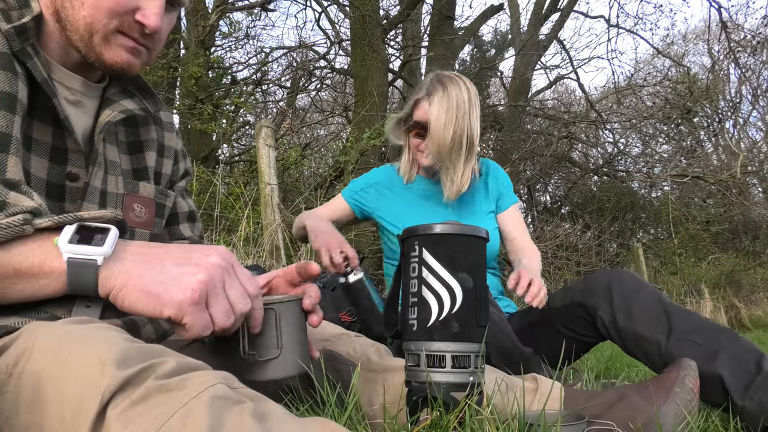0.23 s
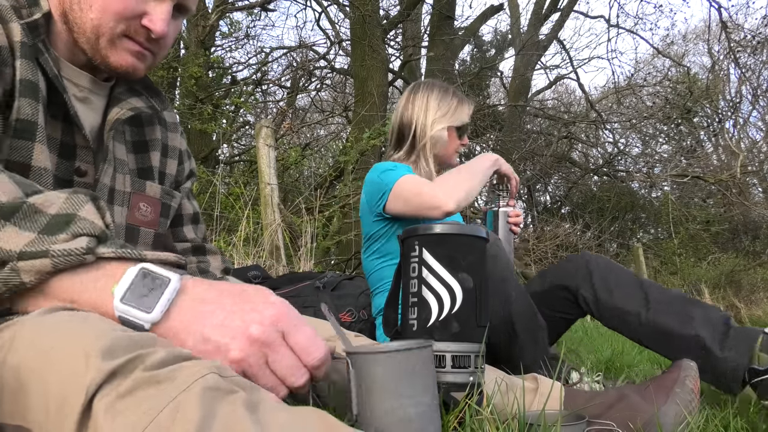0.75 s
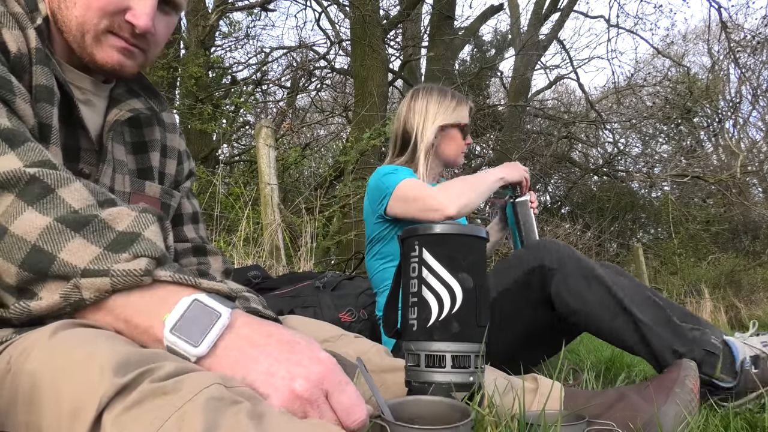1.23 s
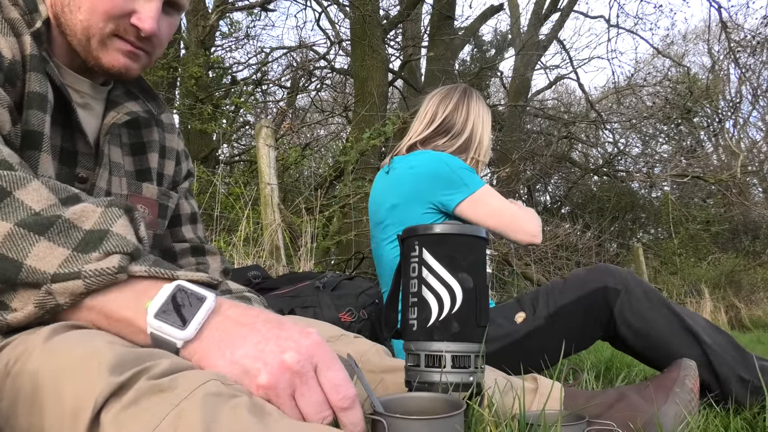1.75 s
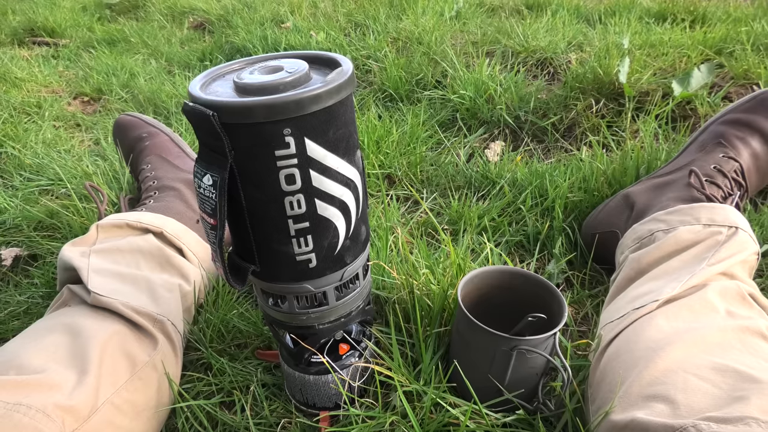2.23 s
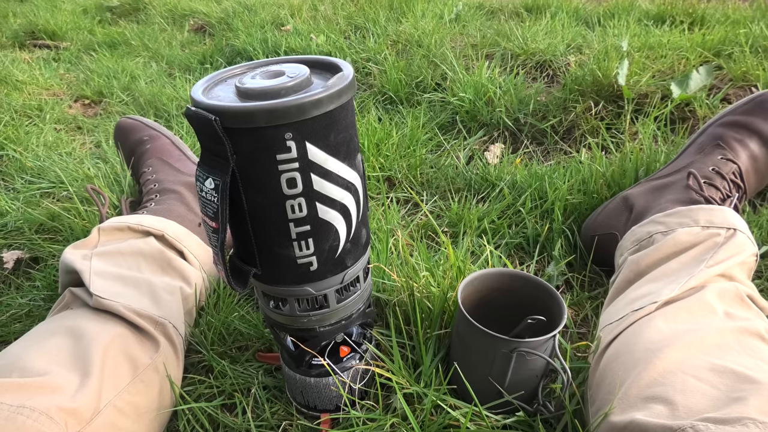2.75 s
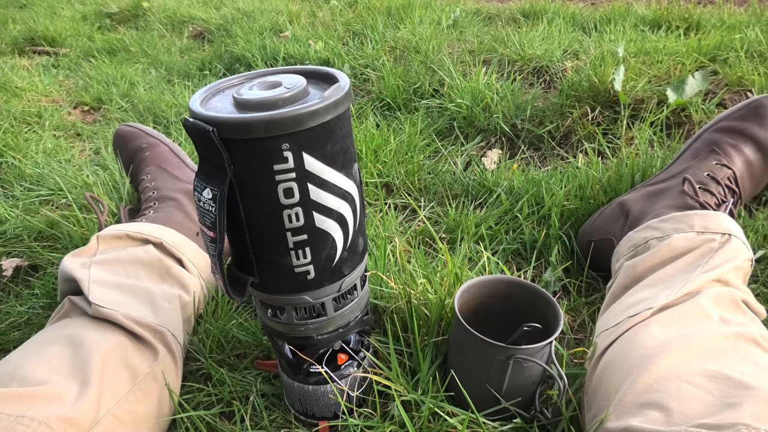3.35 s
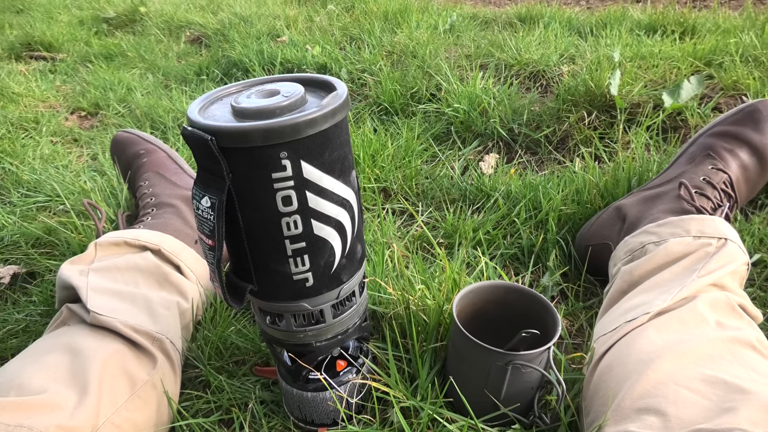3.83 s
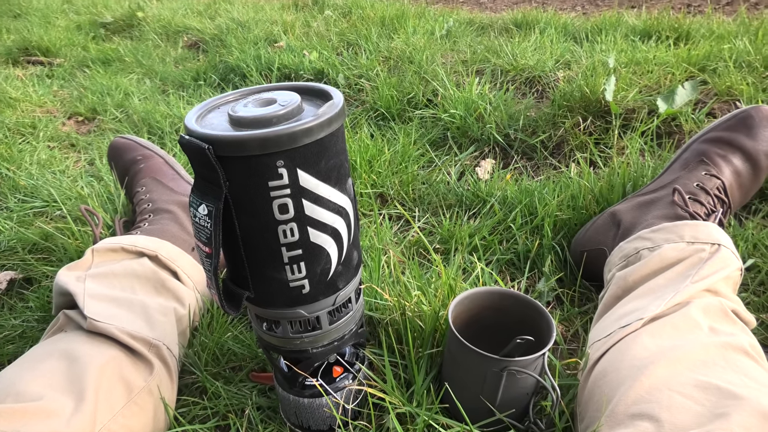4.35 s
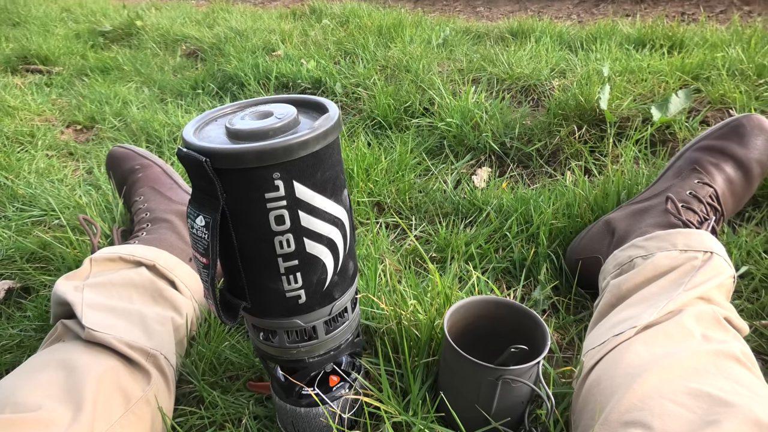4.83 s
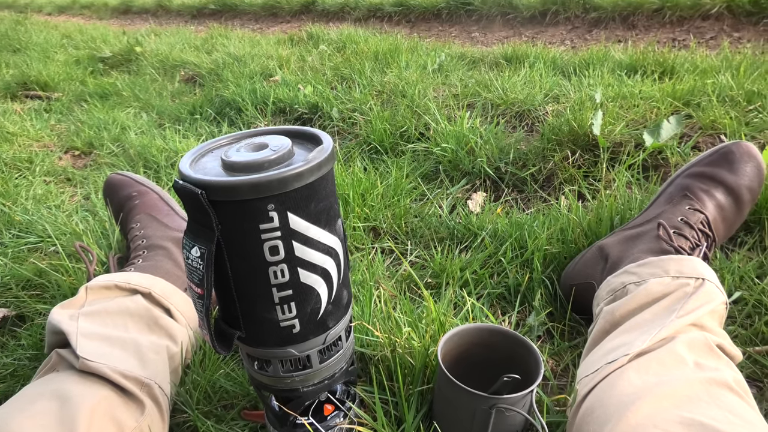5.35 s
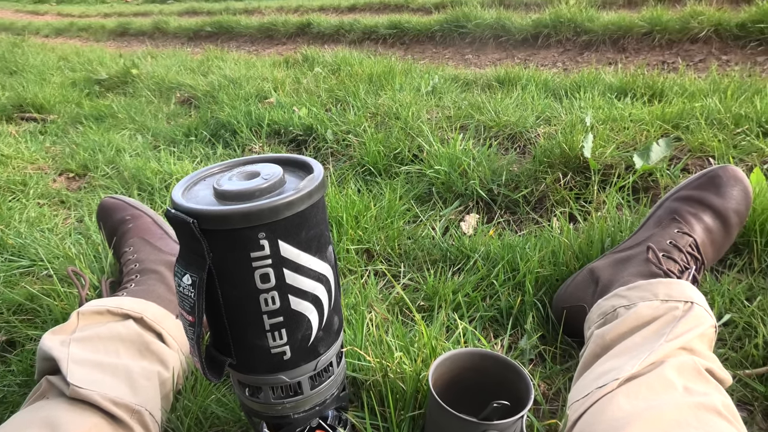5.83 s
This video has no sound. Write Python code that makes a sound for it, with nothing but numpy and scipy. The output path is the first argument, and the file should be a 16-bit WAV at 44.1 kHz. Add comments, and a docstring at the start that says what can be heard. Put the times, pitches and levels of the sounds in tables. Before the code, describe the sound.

Outdoors on grass, a small gas stove hisses continuously over a low flickering flame. A spoon clinks and scrapes on a metal mug at the start, then its wire handle clacks. Just before two seconds the close microphone moves above the burner; the hiss brightens, the flame roar thickens and low wind buffets. Sparse dry ticks, dull bumps and faint rustles follow, with no echo.

```python
"""Gas camping stove and metal mug on grass

Gas jet: broad noise plus noise bands at the burner resonances. Flame: low, flickering filtered noise.
Mug, spoon and wire handle: struck decaying modes, noise chatter and scraping grains.
The microphone moves from beside the stove to above it, into a breeze of low-pitched noise.
Ticks, bumps, rustles and rubs in the grass are enveloped noise; a faint bird is gliding sines."""
import sys
import numpy as np
from scipy import signal
from scipy.fft import rfft, irfft
from scipy.io import wavfile

SR = 44100
rng = np.random.default_rng(int(sys.argv[2]) if len(sys.argv) > 2 else 0)


def persist_wave(psi):
    """Save psi, clipped to +-1, as 16-bit WAV."""
    counts = np.round(np.clip(psi, -1, 1) * 32767).astype(np.int16)
    wavfile.write(sys.argv[1], SR, np.atleast_2d(counts).T)


N = 269010

# burner resonances before tilt: f/Hz, width/Hz, rms level/dB beside, above, at a slant
BURNER_BANDS = [(2305, 600, -57, -50, -49), (2714, 270, -53, -55, -56), (3547, 680, -63, -58, -59),
                (4940, 250, -55.5, -53, -54), (5143, 167, -72, -44.5, -43.5),
                (5640, 420, -51.5, -49.5, -43), (6150, 300, -45, -50.5, -60), (6525, 480, -45, -37, -35.5),
                (6860, 170, -71, -56, -53), (7500, 420, -51, -48, -66), (8127, 310, -47.5, -44.5, -40.5),
                (8690, 650, -44.5, -47, -45.5), (9930, 170, -72, -59.5, -66), (10470, 270, -54.5, -74, -64),
                (11360, 540, -57, -52.5, -52.5), (12200, 200, -62, -62, -70), (12500, 280, -48.5, -61, -48),
                (12830, 300, -59, -53, -55), (13450, 400, -60, -64, -68)]
# broad jet noise: f/Hz, density beside/dB per Hz, density above/dB per Hz
JET_SPECTRA = [(503, -72.5, -103), (606, -81, -92), (735, -76.5, -89.5), (1030, -85.5, -83),
               (1400, -80, -81.5), (2500, -77.5, -85), (3000, -75.5, -85), (3800, -81, -82.5),
               (4300, -79, -86.5), (5970, -85, -81.5), (9260, -89, -82), (9978, -88, -87),
               (14500, -89, -99), (16000, -100, -102)]
# microphone closeness to burner: t/s, level/dB
CLOSENESS_CURVE = [(0, -1.5), (.6, 0), (1.3, .5), (1.72, -2), (1.92, 4), (2.3, 1.1), (3.7, 1), (5.3, -0.2),
                   (5.8, -0.4)]
# flame roar, relative colour: f/Hz, density beside/dB per Hz, density above/dB per Hz
FLAME_SPECTRA = [(30, -29, -32), (62, -20, -23.5), (95, -12, -12.5), (146.7, 0, -3.5), (267, 0, 1.5),
                 (340, -4.5, -2.5), (460, -1.5, -8.5), (537, -14, -14), (642, -25, -19),
                 (768, -15.5, -31.5), (950, -33, -31), (1500, -33, -65)]
# flame roar before trim and flicker: t/s, level/dB
FLAME_CURVE = [(0.0, -40.5), (0.2, -36), (1.82, -36), (1.95, -28), (2.11, -31.5), (4.81, -30), (6.1, -34)]
# moving air, relative colour: f/Hz, density/dB per Hz
WIND_SPECTRUM = [(2, -19), (6, 5), (13, 4), (23, -13), (30, -13), (42, -26), (60, -44), (120, -64.5)]
# mug wall, lowest mode first, free ringing: f/Hz, level/dB, t60/s
MUG_MODES = [(1545, -14, .2), (2200, -10, .03), (2315, -13, .11), (3284, -22, .15), (3537, -11, .068),
             (4274, -20, .06), (4775, -9, .035), (5065, 0, .036), (5360, -9, .05), (6708, -13, .048),
             (7127, -16, .05), (7580, -8.5, .11), (7810, -10, .04), (7930, -8, .035), (8730, -11, .03),
             (10450, -9, .025), (12370, -16, .04), (14143, -12.5, .05)]
# spoon on mug: t/s, ring level/dB, extra on lowest mode/dB, chatter level/dB, chatter t60/s, free ring/s
SPOON_HITS = [(.003, -11, -25, -6, 0.024, 0.025), (.0337, -17.5, -14, -13, 0.017, .04),
              (.279, -24, -20, -17, 0.015, 0.007), (.5887, -28, 18.5, -16.5, 0.027, 0.022),
              (.592, -42, -10, -19.5, 0.05, .03)]
# loose metal, relative colour: f/Hz, density/dB per Hz
CHATTER_SPECTRUM = [(200, -46), (700, -26), (1100, -19), (1600, -3), (2500, -2), (4500, 4), (6000, -9),
                    (8000, 8.5), (10000, -10.5), (14000, -5), (16000, -9)]
# spoon sliding on mug: start t/s, end t/s, level of modal part/dB
SPOON_SLIDES = [(0.027, 0.094, -36), (0.361, 0.472, -34), (0.604, 0.676, -33), (0.665, 0.739, -36.5),
                (1.153, 1.188, -37), (1.541, 1.575, -36.5), (1.57, 1.632, -37.5)]
# mug with spoon pressed on it: f/Hz, level/dB, t60/s
PRESSED_MUG_MODES = [(1555, -15.5, 0.069), (2310, -8.5, 0.026), (3220, -13, 0.018), (3770, -7.5, 0.054),
                     (4560, -1.5, 0.022), (4800, 2, 0.019), (5140, -2.5, 0.018), (6250, -5, 0.0087),
                     (6800, -6, .014), (7430, -1, 0.025), (8540, -3, 0.012)]
# dry rasp, relative colour: f/Hz, density/dB per Hz
RASP_SPECTRUM = [(200, -40), (800, -17), (1600, -1), (4000, 0), (5600, -1), (8000, -2), (10000, -9),
                 (16000, -18)]
# folding wire handle, free ringing: f/Hz, level/dB, t60/s
HANDLE_MODES = [(815, -21.5, 0.035), (1250, -9.5, 0.026), (1635, -11, 0.042), (2050, -16.5, 0.063),
                (2800, 0, 0.016), (3850, -3, 0.042), (4150, 4, 0.018), (4380, 0, 0.017), (5900, 0.5, 0.022),
                (6600, -10, 0.032), (7150, -16, .015), (8440, -9, 0.023), (9260, 3, 0.012),
                (12550, -4, .025)]
# handle on mug: t/s, ring level/dB, extra on lowest mode/dB, chatter level/dB, chatter t60/s, free ring/s
HANDLE_HITS = [(.8205, -14.5, 6, -5.5, 0.0069, .035), (.8243, -44, 2, -26, 0.043, .03),
               (.856, -20.5, 7, -17.5, 0.015, .03), (.858, -27, 6, -23, 0.019, .02)]
# bird: start t/s, end t/s, start f/Hz, end f/Hz, level/dB
BIRD_CHIRPS = [(1.246, 1.3, 3700, 4700, -37.5), (1.72, 1.735, 3580, 3670, -33.5),
               (1.726, 1.747, 1860, 1700, -36), (3.145, 3.175, 3720, 3720, -43.5)]
# dry ticks of grass and cloth: t/s, level/dB, centre f/Hz, half-width/octaves, hold of the crumble/s
GRASS_TICKS = [(2.0732, -21, 5660, 0.39, .007), (2.792, -20.5, 7500, 0.58, 0.0011),
               (2.8305, -22, 5300, 0.46, 0.0056), (3.719, -32, 1900, 0.83, 0.0012),
               (5.0124, -18.5, 2100, 0.74, .0001)]
# dull bumps on the ground: t/s, level/dB
GROUND_BUMPS = [(2.791, -24), (2.831, -29), (3.312, -33), (4.451, -26.5)]
# grass and cloth stirring: start t/s, end t/s, rms level/dB
GRASS_STIRS = [(2.99, 3.06, -42), (3.425, 4.01, -44.5), (5.542, 5.65, -46), (6.02, 6.067, -45.5)]
# grass and cloth, relative colour: f/Hz, density/dB per Hz
RUSTLE_SPECTRUM = [(200, -18), (700, -0.5), (2000, 3.5), (4500, 9), (8000, -9.5), (16000, -11)]
# soft cloth rubs: start t/s, end t/s, start f/Hz, level/dB
CLOTH_RUBS = [(5.407, 5.483, 740, -47), (5.489, 5.553, 521, -43), (5.55, 5.62, 780, -49)]

TIME_S = np.arange(N) / SR
FREQS_HZ = np.maximum(np.fft.rfftfreq(N, 1 / SR), .1)   # above 0 for the logarithm

MOVE_S, MOVE_SETTLE_S = 1.65, 0.35   # beside to above
ABOVE_BEFORE, ABOVE_AFTER = 0.056, 0.94   # listening place: 0 beside, 1 above
SWING_S, SWING_WIDTH_S, RESTING_SLANT = 2.66, .31, .1   # one swing to a slant and back
SLANT_PITCH_RISE = .026   # share at full swing
HISS_DB = 0.03
HISS_TILT_DB_PER_OCTAVE, SLANT_TILT_DB_PER_OCTAVE = 1.5, -10.5   # at rest; added at full swing
CLOSE_TILT_PER_OCTAVE = 0.83   # dB of tilt per dB of closeness
TILT_FROM_HZ = 6500
FLAME_TRIM_DB, FLAME_FLICKER_DB, FLAME_FLICKER_HZ = 0.5, 0.6, 8.6
CALM_DB, BREEZE_DB, BREEZE_FADE_DB_PER_S = -48.5, -24.5, 0.74   # breeze before fade and gust
BREEZE_S, BREEZE_RISE_S = 1.71, 0.11
GUST_S, GUST_WIDTH_S, GUST_DB = 3.05, 0.39, 5.5
TICK_T60_S, TICK_T60_PER_LENGTH = 0.0018, 2.2   # longer crumbles die more slowly
CRUMBLE_HZ, CRUMBLE_OCTAVES, CRUMBLE_DB = 5230, 1.3, -10.5   # broad crunch shared by all ticks
BUMP_HZ, BUMP_OCTAVES, BUMP_T60_S = 660, 0.45, 0.017
RUB_RISE_OCTAVES_PER_S, RUB_WIDTH_HZ, RUB_EDGE_S = 4.8, 150, 0.026
CUTOFF_HZ = 15900


def from_db(db):
    """Decibels to gain."""
    return 10 ** (np.asarray(db) / 20)


def rms_one(x):
    """Scale to unit rms."""
    return x / np.sqrt(np.mean(x ** 2) + 1e-20)


def in_time(rows):
    """Each column of a curve table at every sample."""
    t_s, *columns = np.transpose(rows)
    return [np.interp(TIME_S, t_s, column) for column in columns]


def spectrum_gain(hz, db):
    """Gain per FFT bin, interpolated in dB over log frequency."""
    return from_db(np.interp(np.log(FREQS_HZ), np.log(hz), db))


def coloured(spectrum):
    """One white noise shaped by each dB-per-Hz column."""
    hz, *columns = np.transpose(spectrum)
    white = rfft(rng.standard_normal(N)) * np.sqrt(SR / 2)   # unit density per Hz
    return [irfft(white * spectrum_gain(hz, db), N) for db in columns]


def tinted(x, spectrum):
    """Colour a signal by a spectrum; rms 1."""
    hz, db = np.transpose(spectrum)
    return rms_one(irfft(rfft(x) * spectrum_gain(hz, db), N))


def wander(width_hz):
    """Low-passed random motion; rms 1."""
    run_in = SR // 2   # lets the filter settle
    lowpass = signal.butter(2, width_hz, fs=SR, output="sos")
    motion = signal.sosfilt(lowpass, rng.standard_normal(N + run_in))
    return rms_one(motion[run_in:])


def band_around(force, hz, octaves):
    """Band-pass around a pitch; white noise keeps its level."""
    low_hz, high_hz = np.clip([hz / 2 ** octaves, hz * 2 ** octaves], 50, .45 * SR)
    bandpass = signal.butter(2, [low_hz, high_hz], "band", fs=SR, output="sos")
    return signal.sosfilt(bandpass, force + 1e-18) / np.sqrt(2 * (high_hz - low_hz) / SR)


def ring(force, hz, t60_s):
    """Two-pole resonator: a unit click starts a decaying sine of height 1."""
    radius = np.exp(-np.log(1000) / (t60_s * SR))
    angle = 2 * np.pi * hz / SR
    return signal.lfilter([0, np.sin(angle)], [1, -2 * radius * np.cos(angle), radius ** 2], force + 1e-18)


def grains(per_s, spread_db):
    """Random tiny clicks, mostly small with a few large ones."""
    sizes = from_db(spread_db * np.minimum(rng.exponential(1, N), 4)) * rng.choice([-1, 1], N)
    return (rng.random(N) < per_s / SR) * sizes


def dying(start_s, t60_s):
    """Envelope that jumps to 1 and decays."""
    return (TIME_S >= start_s) * np.exp(-np.log(1000) * np.clip((TIME_S - start_s) / t60_s, 0, 10))


def swell(start_s, end_s, edge_s):
    """Envelope with rounded edges between two times."""
    return np.sin(np.pi / 2 * np.clip(np.minimum(TIME_S - start_s, end_s - TIME_S) / edge_s, 0, 1))


def passing(centre_s, width_s):
    """Smooth rise to 1 and fall around a moment."""
    return np.exp(-.5 * ((TIME_S - centre_s) / width_s) ** 2)


def microphone_path():
    """Closeness in dB, place from beside to above, and the single swing to a slant."""
    moved = 1 - np.exp(-np.maximum(TIME_S - MOVE_S, 0) / MOVE_SETTLE_S)
    above = np.clip(ABOVE_BEFORE + (ABOVE_AFTER - ABOVE_BEFORE) * moved, 0, 1)
    return in_time(CLOSENESS_CURVE)[0], above, passing(SWING_S, SWING_WIDTH_S)


def jet(above, slant, shift, tilt_db, flutter_db):
    """Turbulent gas: broad noise plus burner resonances, balanced by listening place."""
    beside_noise, above_noise = coloured(JET_SPECTRA)
    out = (1 - above) * beside_noise + above * above_noise
    for hz, width_hz, beside_db, above_db, slant_db in BURNER_BANDS:
        phase = 2 * np.pi * np.cumsum(hz * shift) / SR
        band = wander(width_hz / 2) * np.cos(phase) + wander(width_hz / 2) * np.sin(phase)
        overhead = (1 - slant) * from_db(above_db) + slant * from_db(slant_db)
        place_gain = (1 - above) * from_db(beside_db) + above * overhead
        # highest resonances are the most directional
        beaming = from_db(tilt_db * max(np.log2(hz / TILT_FROM_HZ), 0))
        out += band * beaming * place_gain
    return out * from_db(flutter_db * wander(35))


def flame(above):
    """Combustion roar: low noise with a flickering level."""
    beside_noise, above_noise = map(rms_one, coloured(FLAME_SPECTRA))
    flicker_db = FLAME_FLICKER_DB * wander(FLAME_FLICKER_HZ)
    level_db = in_time(FLAME_CURVE)[0] + FLAME_TRIM_DB + flicker_db
    return from_db(level_db) * ((1 - above) * beside_noise + above * above_noise)


def stove():
    """Jet plus flame; colour follows the microphone's path, closeness sets the hiss level."""
    close_db, above, swing = microphone_path()
    slant = np.clip(RESTING_SLANT + swing, 0, 1)
    shift = 1 + SLANT_PITCH_RISE * swing ** 2
    tilt_db = HISS_TILT_DB_PER_OCTAVE + CLOSE_TILT_PER_OCTAVE * close_db + SLANT_TILT_DB_PER_OCTAVE * swing ** 2
    hiss = from_db(HISS_DB + close_db) * jet(above, slant, shift, tilt_db, flutter_db=0.55)
    return hiss + flame(above)


def wind():
    """Slow pressure swings of moving air: calm, then a breeze that gusts once and eases."""
    fade_db = -BREEZE_FADE_DB_PER_S * (TIME_S - BREEZE_S)
    breeze_db = BREEZE_DB + fade_db + GUST_DB * passing(GUST_S, GUST_WIDTH_S)
    exposed = np.clip((TIME_S - BREEZE_S) / BREEZE_RISE_S, 0, 1)
    return (from_db(CALM_DB) + exposed * from_db(breeze_db)) * rms_one(coloured(WIND_SPECTRUM)[0])


def strikes(hits, modes, scatter_db, damped_t60_s):
    """Each blow rings all modes at scattered strengths, damped after a free time; loose metal chatters."""
    out = np.zeros(N)
    chatter = tinted(rng.standard_normal(N), CHATTER_SPECTRUM)
    hz, mode_db, t60_s = np.transpose(modes)[:, :, None]
    age_s = np.arange(SR // 4) / SR
    for hit_s, ring_db, lowest_db, chatter_db, chatter_t60_s, free_s in hits:
        scatter = scatter_db * rng.standard_normal(hz.shape)
        strength_db = ring_db + mode_db + lowest_db * (hz == hz[0]) + scatter
        damping = np.maximum(age_s - free_s, 0) / damped_t60_s
        decay = np.exp(-np.log(1000) * (age_s / t60_s + damping))
        tone = from_db(strength_db) * decay * np.sin(2 * np.pi * (hz * age_s + rng.random(hz.shape)))
        start = max(int(hit_s * SR), 0)
        out[start:start + len(age_s)] += tone.sum(axis=0)
        out += from_db(chatter_db) * dying(hit_s, chatter_t60_s) * chatter
    return out


def scrapes(rasp_db, uneven_db):
    """Dense little slips of the spoon drive the mug's modes, with a dry rasp on top."""
    slips = grains(per_s=3000, spread_db=3.5) * from_db(uneven_db * wander(90))
    body = np.zeros(N)
    for k, (hz, db, t60_s) in enumerate(PRESSED_MUG_MODES):
        body += (-1) ** k * from_db(db) * ring(slips, hz, t60_s)   # alternating polarity
    rasp = tinted(rng.permutation(slips), RASP_SPECTRUM)
    pressure = sum(from_db(db) * swell(start_s, end_s, 0.019) for start_s, end_s, db in SPOON_SLIDES)
    return pressure * (rms_one(body) + from_db(rasp_db) * rasp)


def bird(waver):
    """Thin whistles: unsteady sines that glide quickly at first, then level off."""
    out, unsteady = np.zeros(N), 1 + waver * wander(200)
    for start_s, end_s, start_hz, end_hz, db in BIRD_CHIRPS:
        glide = np.sin(np.pi / 2 * np.clip((TIME_S - start_s) / (end_s - start_s), 0, 1))
        pitch_hz = (start_hz + (end_hz - start_hz) * glide) * unsteady
        out += from_db(db) * swell(start_s, end_s, 0.0038) * np.sin(2 * np.pi * np.cumsum(pitch_hz) / SR)
    return out


def ticks(snap_db):
    """A stalk or fold snaps: one click and a short crumble, around a pitch of its own."""
    out = np.zeros(N)
    for start_s, db, hz, octaves, length_s in GRASS_TICKS:
        end_s = start_s + length_s
        held = (TIME_S >= start_s) & (TIME_S < end_s)
        tail = dying(end_s, TICK_T60_S + TICK_T60_PER_LENGTH * length_s)
        force = rng.standard_normal(N) * (held + tail)
        crunch = from_db(CRUMBLE_DB) * band_around(force, CRUMBLE_HZ, CRUMBLE_OCTAVES)
        force[int((start_s + length_s / 2) * SR)] += from_db(snap_db)   # click, pitched band only
        out += from_db(db) * (band_around(force, hz, octaves) + crunch)
    return out


def bumps():
    """Something shifts on the turf: short, dull, band-passed noise knocks."""
    force = sum(from_db(db) * dying(start_s, BUMP_T60_S) for start_s, db in GROUND_BUMPS)
    return band_around(force * rng.standard_normal(N), BUMP_HZ, BUMP_OCTAVES)


def rustle():
    """Grass and cloth under shifting legs: a faint crackle of random grains."""
    motion = sum(from_db(db) * swell(start_s, end_s, 0.016) for start_s, end_s, db in GRASS_STIRS)
    return motion * tinted(grains(per_s=450, spread_db=5), RUSTLE_SPECTRUM)


def rubs():
    """A leg slides a little: a narrow band of friction noise climbs in pitch."""
    out = np.zeros(N)
    for start_s, end_s, start_hz, db in CLOTH_RUBS:
        pitch_hz = start_hz * 2 ** (RUB_RISE_OCTAVES_PER_S * (np.clip(TIME_S, start_s, end_s) - start_s))
        carrier = np.sin(2 * np.pi * np.cumsum(pitch_hz) / SR)
        friction = rms_one(wander(RUB_WIDTH_HZ / 2) * carrier)
        out += from_db(db) * swell(start_s, end_s, RUB_EDGE_S) * friction
    return out


def scene():
    """Open air, no echo; one microphone feeds both channels."""
    burner = stove()
    air = wind()
    spoon = strikes(SPOON_HITS, MUG_MODES, scatter_db=3.0, damped_t60_s=0.023)
    spoon += scrapes(rasp_db=-2.0, uneven_db=2.0)
    handle = strikes(HANDLE_HITS, HANDLE_MODES, scatter_db=2.0, damped_t60_s=.025)
    outdoors = bird(waver=0.012) + ticks(snap_db=13.5) + bumps() + rustle() + rubs()
    return np.tile(burner + air + spoon + handle + outdoors, (2, 1))


def record(dry):
    """Clip the highest peaks, then cut the top with a steep low-pass."""
    lowpass = signal.ellip(10, .1, 80, CUTOFF_HZ, fs=SR, output="sos")
    return signal.sosfilt(lowpass, np.clip(dry, -.8, .8))


dry = scene()
out = record(dry)
persist_wave(out)
```